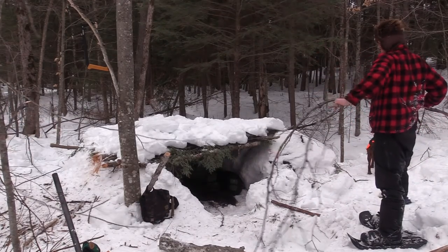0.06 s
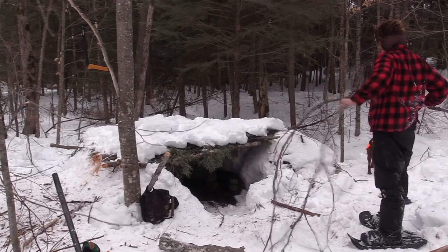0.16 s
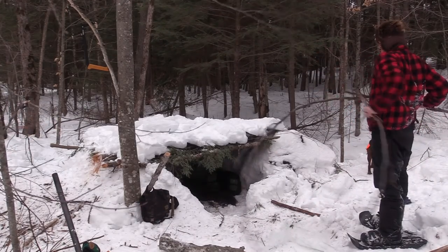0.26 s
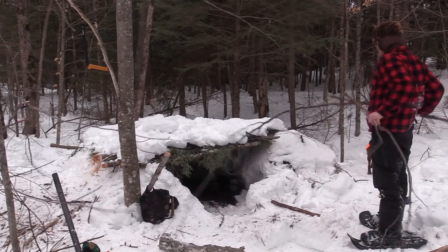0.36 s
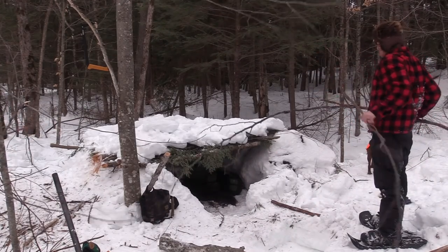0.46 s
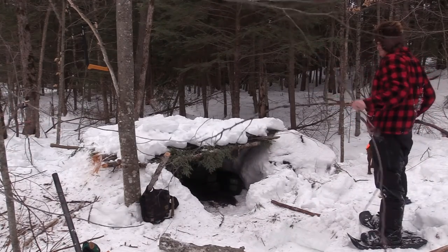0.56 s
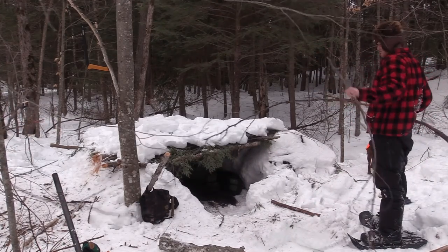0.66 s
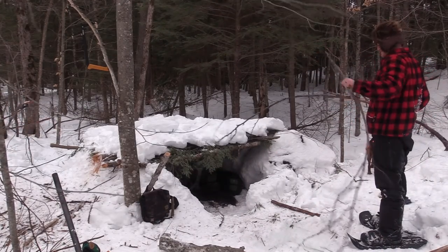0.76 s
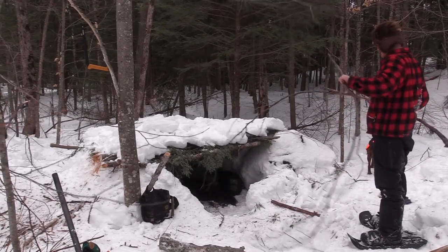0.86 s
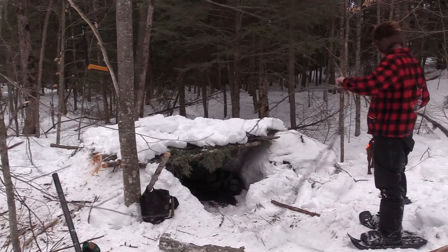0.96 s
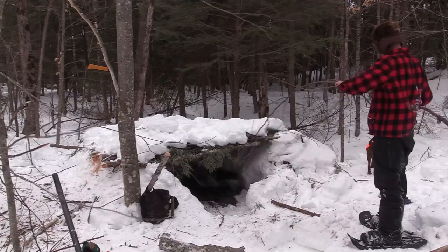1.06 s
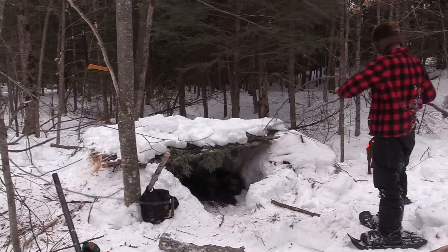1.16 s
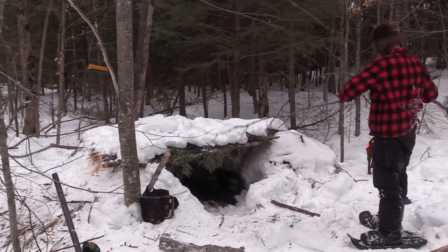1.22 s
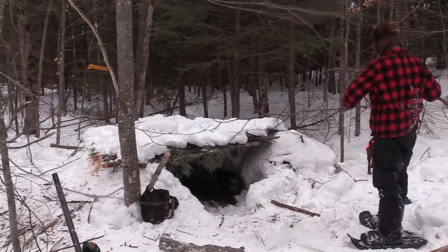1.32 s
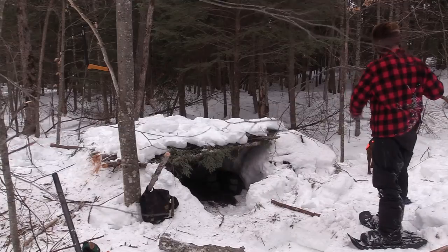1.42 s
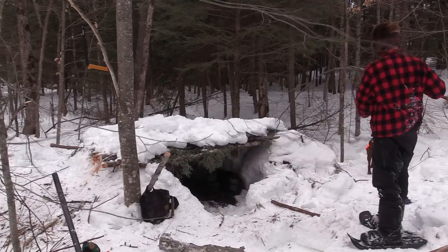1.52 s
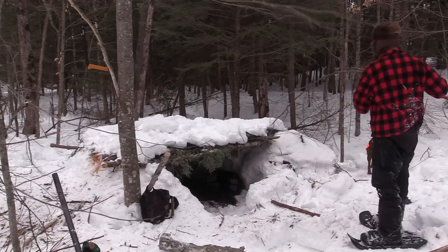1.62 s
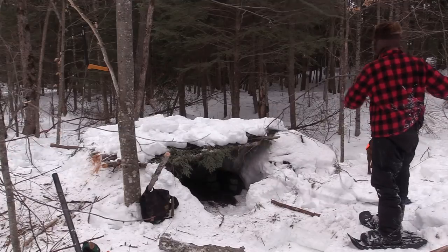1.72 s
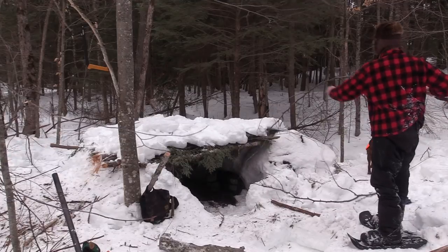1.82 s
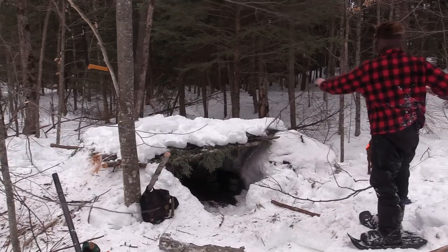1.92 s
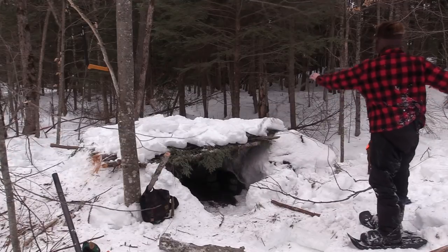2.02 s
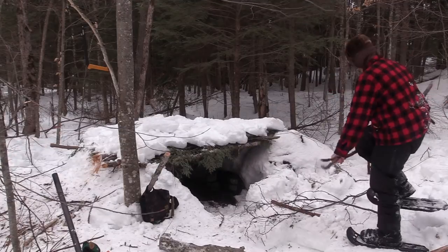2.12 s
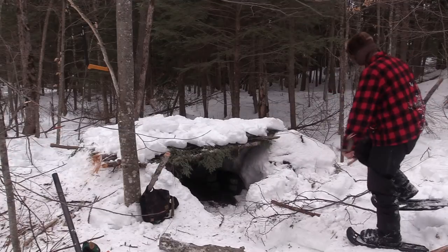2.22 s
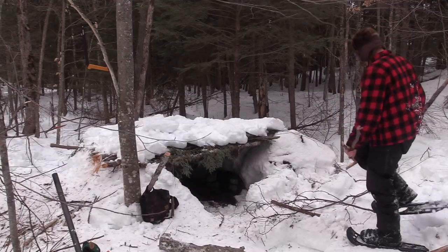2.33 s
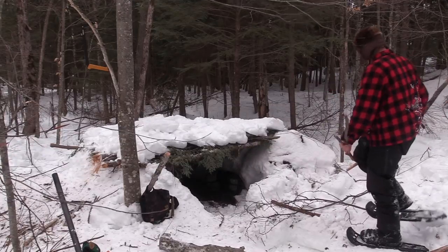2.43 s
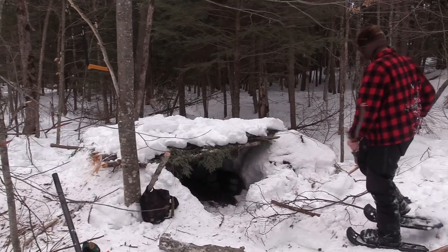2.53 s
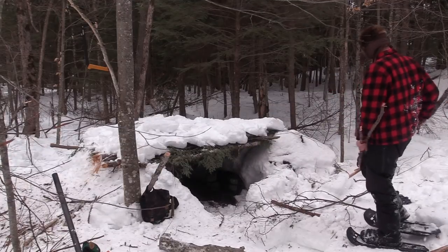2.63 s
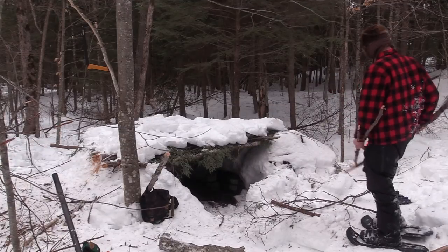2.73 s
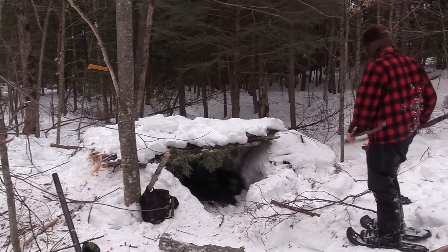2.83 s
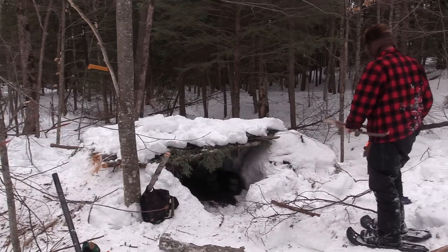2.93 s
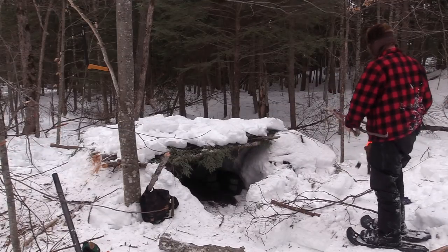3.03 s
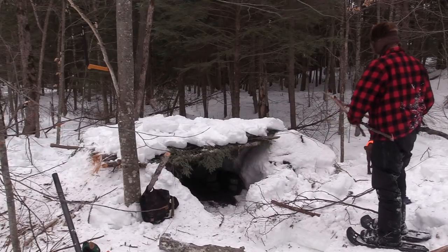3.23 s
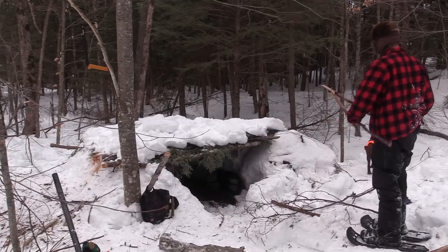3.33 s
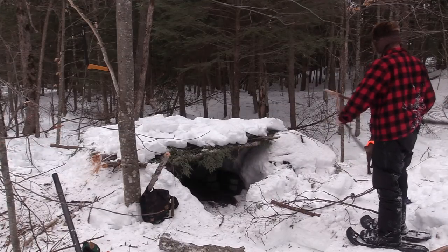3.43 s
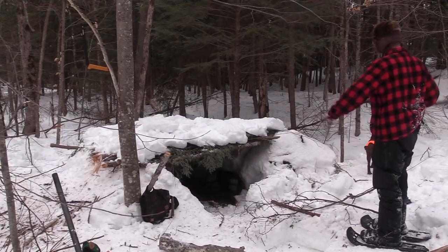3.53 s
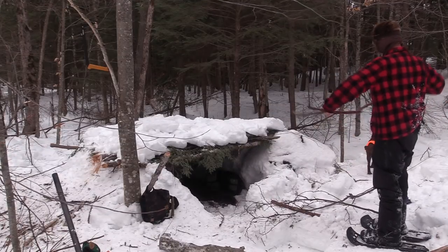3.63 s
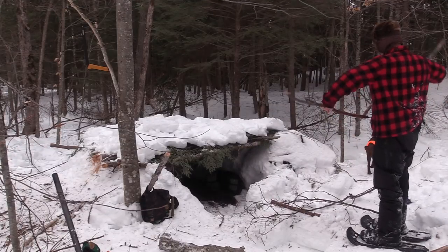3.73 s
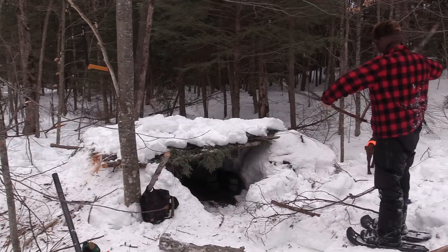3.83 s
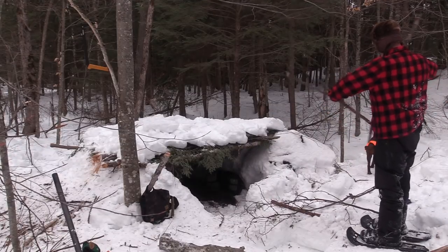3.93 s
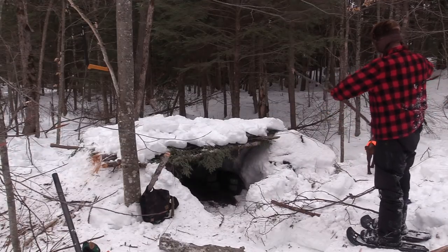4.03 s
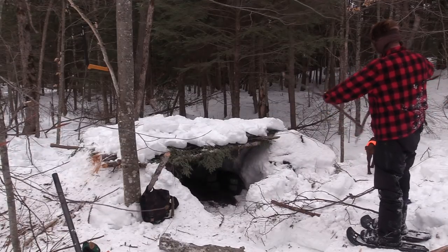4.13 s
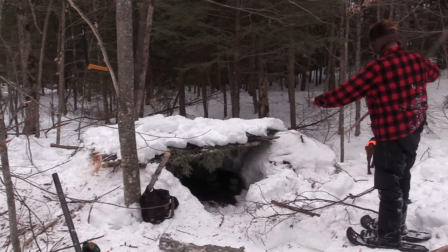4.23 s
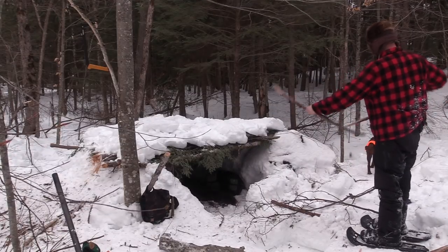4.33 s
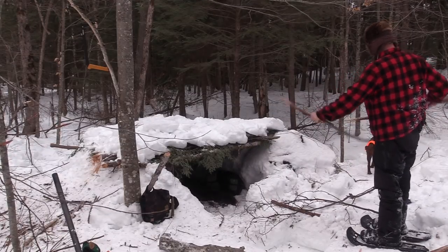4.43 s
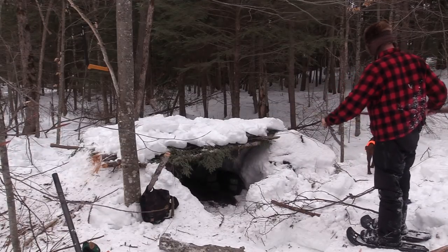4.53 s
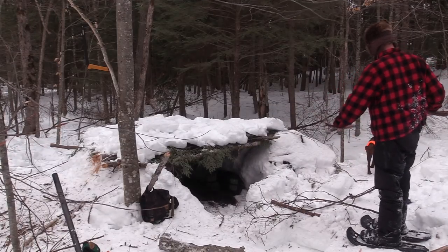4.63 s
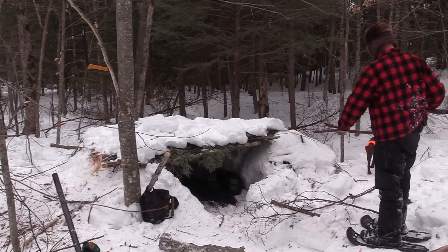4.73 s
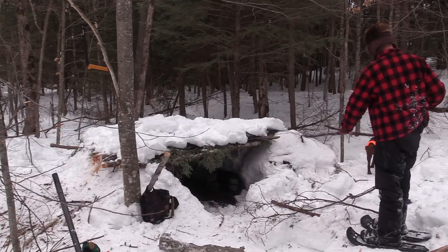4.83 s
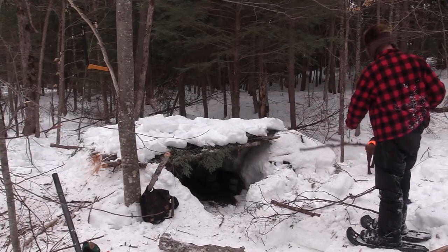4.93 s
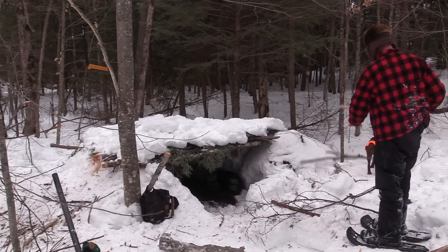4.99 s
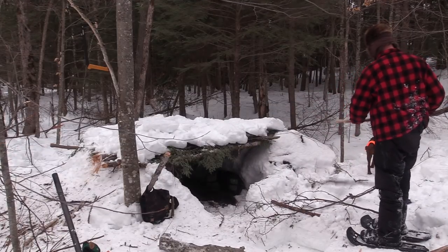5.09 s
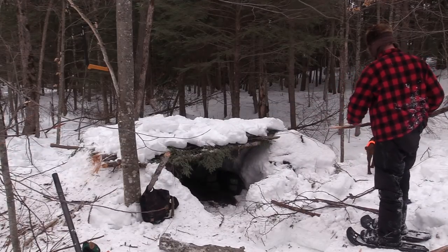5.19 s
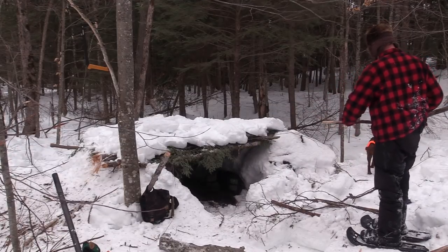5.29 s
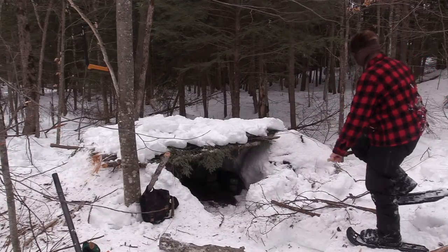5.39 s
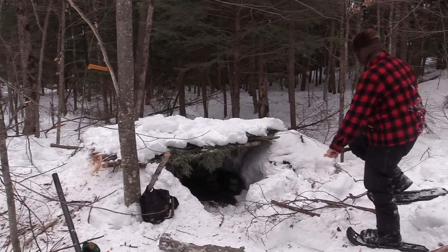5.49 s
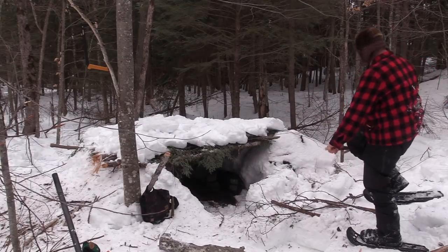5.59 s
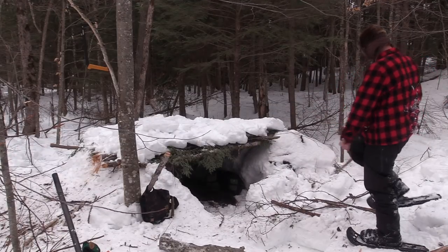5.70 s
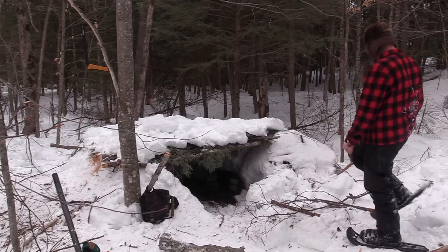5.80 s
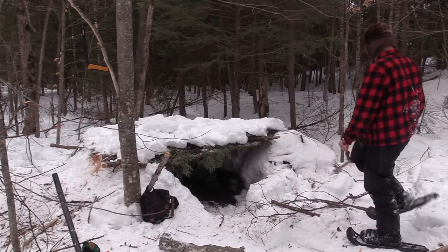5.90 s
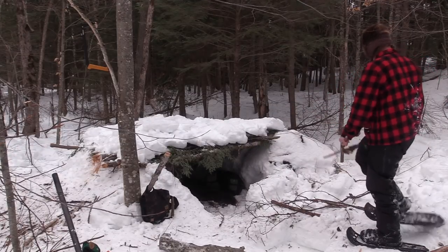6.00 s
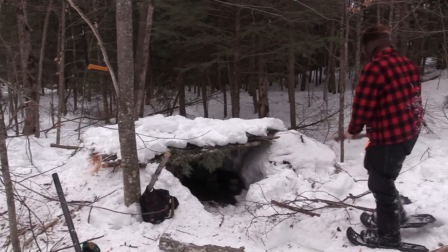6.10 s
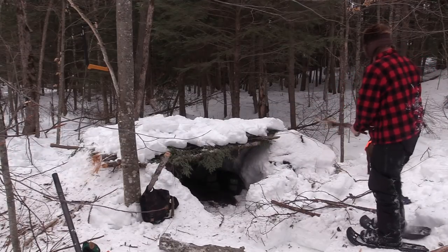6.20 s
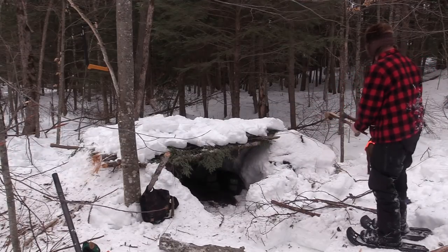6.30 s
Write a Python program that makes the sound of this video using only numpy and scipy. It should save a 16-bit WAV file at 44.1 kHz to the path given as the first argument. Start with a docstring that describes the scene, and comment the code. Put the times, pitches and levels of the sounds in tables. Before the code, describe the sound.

Close, dry outdoor sound of a branch being broken in snowy woods. A sharp crack comes almost at once, then faint rustling; a very loud double snap follows with a shower of crackling twigs. Softer snow crunches and small twig snaps lead to another big splintering break, then a final snowshoe crunch with a tiny squeak. Soft wind, low gusts on the microphone, and light echoes from the trees.

```python
"""Winter woods: someone on snowshoes breaks up a dry branch; sticks crack, twigs tick and rustle, snow crunches.
Breaks are noise bursts and tiny pings through wood resonances; brush and snow are dense random grains.
Thuds, woody rings and a snow squeak are short tones with noise; wind is coloured noise, with a faint whine.
Decaying noise echoes stand for the trunks that scatter every sound of the work.
A gain control ducks above a limit, holds 0.35 s and climbs back."""
import sys
import numpy as np
from scipy import signal
from scipy.fft import rfft, irfft, next_fast_len
from scipy.io import wavfile
from scipy.ndimage import uniform_filter1d, minimum_filter1d, map_coordinates

SR = 44100
rng = np.random.default_rng(int(sys.argv[2]) if len(sys.argv) > 2 else 0)


def persist_wave(psi):
    """Save psi, clipped to +-1, as 16-bit WAV."""
    counts = np.round(np.clip(psi, -1, 1) * 32767).astype(np.int16)
    wavfile.write(sys.argv[1], SR, np.atleast_2d(counts).T)


N = 280035
TOP_HZ = 16100  # top of the grain pitches and of the final band


def amp(db):
    """Decibels to gain."""
    return np.exp(np.asarray(db) * np.log(10) / 20)


def unit(x):
    """Scale to rms 1."""
    return x / np.sqrt(np.mean(x ** 2) + 1e-20)


def along(points, hz):
    """(Hz, value) points interpolated on a log frequency axis."""
    f, v = np.transpose(points)
    return np.interp(np.log(hz + 1), np.log(f), v)


def curve(rows, axis=1):
    """One column of a timed table, one value per sample."""
    cols = np.transpose(rows)
    return np.interp(np.arange(N) / SR, cols[0], cols[axis])


def wobble(rate):
    """Smooth random curve, rate knots a second."""
    steps = np.arange(0, N + 8, 8)
    knots = rng.standard_normal(int(N * rate / SR) + 4)
    coarse = map_coordinates(knots, [steps * rate / SR])
    return np.interp(np.arange(N), steps, coarse)


def filtered(x, response):
    """x times a response of frequency, zero phase."""
    m = next_fast_len(N + SR // 2)
    return irfft(rfft(x, m) * response(np.fft.rfftfreq(m, 1 / SR)), m)[:N]


def noise(spectrum):
    """Coloured noise of rms 1."""
    return unit(filtered(rng.standard_normal(N), lambda hz: amp(along(spectrum, hz))))


def narrow(hz, rate):
    """Fuzzy line of rms 1 on a pitch curve; rate sets how fast it flutters."""
    phase = 2 * np.pi * np.cumsum(hz) / SR
    return unit(wobble(rate) * np.sin(phase) + wobble(rate) * np.cos(phase))


def body(spectrum, modes=(), bright_db=0, size=1024):
    """Minimum-phase impulse response of energy 1: a spectrum, tilted, with resonances on top."""
    hz = np.fft.rfftfreq(size, 1 / SR)
    tilt = along([(1800, -.5), (8000, .5)], hz)
    db = along(spectrum, hz) + bright_db * tilt
    for centre_hz, width_hz, peak_db in modes:
        db = db + peak_db / (1 + (2 * (hz - centre_hz) / width_hz) ** 2)
    cepstrum = irfft(np.log(amp(db)))
    n = np.arange(size)
    causal = 2 * cepstrum * (n < size // 2) * (n > 0)
    h = irfft(np.exp(rfft(causal)))
    return h / np.linalg.norm(h)


def grains(count, rate, spread_db, ring):
    """Tiny breaks of unequal size, rate a second, random pitch, e-folding in ring seconds; rms 1."""
    draws = rng.random((int(count * rate / SR) + 1, 4))
    start, hz, rarity, phase = draws.T[:, :, None]
    size = amp(spread_db * np.minimum(-np.log(rarity), 4))
    k = np.arange(80)
    pings = size * np.cos(2 * np.pi * (hz * TOP_HZ * k / SR + phase)) * np.exp(-k / SR / ring)
    where = (start * count).astype(int) + k
    return unit(np.bincount(where.ravel(), pings.ravel(), count)[:count])


def add(out, s, sound):
    """Mix a sound in at s seconds."""
    start = round(s * SR)
    out[start:start + len(sound)] += sound[:N - start]


def envelope(start, length, attack, t60):
    """Rises in attack seconds, holds until length, then dies away."""
    out, t = np.zeros(N), np.arange(int((length + t60) * SR)) / SR
    decay_db = -60 * np.maximum(t - length, 0) / t60
    add(out, start, np.minimum(t / attack, 1) * amp(decay_db))
    return out


# sigh of the trees: f/Hz, density/dB per Hz
TREE_SPECTRUM = [(20, -24), (130, 0.5), (430, 1.5), (1000, -2.5), (1400, -3.5), (1900, -15), (3000, -19),
                 (6000, -24.5), (16000, -31.5)]
# faint wavering whine: t/s, f/Hz, level/dB
WHINE_TRACK = [(0, 1420, -68), (.8, 1394, -62), (1.4, 1295, -63), (2.0, 1243, -63.5), (4.5, 1417, -79)]
# wind at the microphone: f/Hz, density/dB per Hz
WIND_SPECTRUM = [(20, -13.5), (50, -14), (98, 3.5), (190, -15), (1000, -60)]
# puffs of wind: t/s, level/dB, half-width to 1/e/s
WIND_PUFFS = [(.17, -50.5, 0.071), (.75, -52, 0.026), (1.0, -54, 0.2), (1.047, -45, 0.035),
              (1.801, -48, 0.16), (3.03, -56.5, 0.16), (5.335, -47.5, 0.072), (6.27, -55, .1)]
BREEZE_DB, FLUTTER_DB = -70, -1  # wind between puffs; its unsteadiness


def air():
    """Noise sigh of the woods, a thin far whine, and low gusts that swell and fade on the microphone."""
    sigh = amp(-53 + 1.4 * wobble(3.22)) * noise(TREE_SPECTRUM)
    whine = amp(curve(WHINE_TRACK, axis=2)) * narrow(curve(WHINE_TRACK), rate=160)
    t = np.arange(N) / SR
    wind = amp(BREEZE_DB)
    for s, db, width_s in WIND_PUFFS:
        wind = wind + amp(db) * np.exp(-np.minimum(((t - s) / width_s) ** 2, 20))
    gusts = wind * amp(FLUTTER_DB * wobble(18)) * noise(WIND_SPECTRUM)
    return sigh + whine + gusts


# crunching snow: f/Hz, density/dB per Hz
SNOW_SPECTRUM = [(40, -37), (150, -11.5), (450, -3), (1100, 6), (2700, 1.5), (5000, 1.5), (8000, -2),
                 (12000, -18), (16000, -32)]
# snowshoe presses into snow: t/s, length/s, level/dB
SNOW_STEPS = [(2.698, 0.025, -32), (2.798, 0.05, -34), (2.892, 0.074, -38), (3.104, 0.011, -31),
              (3.504, 0.095, -45), (3.649, 0.015, -32), (6.042, 0.079, -39.5), (6.111, 0.04, -28),
              (6.211, 0.12, -34), (6.23, 0.01, -25)]
STEP_ATTACK_S, STEP_T60_S = 0.0081, 0.088
SOLE_DB = -10  # re crunch


def snow():
    """Ice grains collapse in little avalanches over the dull press of the sole."""
    weight = np.zeros(N)
    for start, length, db in SNOW_STEPS:
        weight += amp(db) * envelope(start, length, STEP_ATTACK_S, STEP_T60_S)
    crystals = grains(N, rate=5500, spread_db=1.6, ring=0.00064) * amp(3 * wobble(140))
    crunch = unit(signal.fftconvolve(crystals, body(SNOW_SPECTRUM))[:N])
    press = noise([(40, -12), (150, 3), (500, 6.5), (1000, -8), (2500, -12.5)])
    sole = amp(SOLE_DB + 2.7 * wobble(60)) * press
    return weight * (crunch + sole)


# one squeak of packed snow: t/s, length/s, level/dB
SNOW_SQUEAK = (6.14, 0.028, -33.5)
# snowshoe frame resonances: f/Hz, level/dB
FRAME_MODES = [(1590, -3), (2610, -1)]
SQUEAK_RISE_PER_S = 1.57  # relative pitch rise


def squeak():
    """Packed snow slips and rings the frame; the pitch rises as the weight comes on."""
    start, length, db = SNOW_SQUEAK
    rise = 1 + SQUEAK_RISE_PER_S * np.clip(np.arange(N) / SR - start, 0, length)
    ring = sum(amp(level_db) * narrow(hz * rise, rate=330) for hz, level_db in FRAME_MODES)
    return amp(db) * envelope(start, length, STEP_ATTACK_S, t60=0.067) * ring


# dull bumps of branch and snowshoe: t/s, level/dB, f/Hz
DULL_BUMPS = [(0.144, -34, 250), (1.831, -24, 234), (3.114, -33.5, 219), (3.158, -39.5, 161),
              (5.904, -37, 160), (6.216, -32, 120)]


def thuds():
    """A soft blow is a couple of low cycles and a dull puff."""
    out, t = np.zeros(N), np.arange(SR // 8) / SR
    puff = body([(100, -6.0), (1100, 1.5), (2200, -18.0), (8000, -44.5)])
    for s, db, hz in DULL_BUMPS:
        dust = signal.fftconvolve(rng.standard_normal(len(t)), puff)[:len(t)]
        blow = 1.6 * np.sin(2 * np.pi * hz * t) + 0.89 * dust
        add(out, s, amp(db - 60 * t / 0.031) * (1 - np.exp(-t / .0015)) * blow)
    return out


# rustling twigs: f/Hz, density/dB per Hz
RUSTLE_SPECTRUM = [(100, -27), (700, -11), (1800, -2.5), (3500, -1), (8000, -1.5), (10500, -2),
                   (12000, -7.5), (16000, -7.5)]
CLACK_DB, CLACK_HZ = 2.5, 2700  # gain re ticks, median pitch


def clacks(gain, count):
    """Side twigs tap at random moments, each with one woody resonance, as loud as the ticking allows."""
    out, t = np.zeros(N), np.arange(SR // 80) / SR
    for at, pitch in zip(rng.integers(0, N, count), rng.standard_normal(count)):
        hz = CLACK_HZ * np.exp(.5 * pitch)
        contact = rng.standard_normal(len(t)) * amp(-60 * t / .011)
        tap = np.convolve(contact, body(RUSTLE_SPECTRUM, [(hz, 0.34 * hz, 14)], size=256))
        add(out, at / SR, gain[at] * amp(CLACK_DB) * tap)
    return out


# twig rustle, and splinter showers after big breaks: t/s, length/s, level/dB, t60/s, tick share of power/0-1
RUSTLE_BURSTS = [(0.0, 0.43, -46, 3.9, 0.42), (0.755, 0.19, -53.5, 1.4, 0.84),
                 (1.135, 0.63, -66.5, 0.89, 1), (1.75, 0.081, -42, 1.27, 0.72),
                 (2.227, 0.075, -18.5, 0.37, 1), (2.545, 0.11, -29, 0.83, 0.68),
                 (2.956, 0.13, -40, 0.69, 0.82), (3.186, 0.079, -45.5, 1.4, 1),
                 (3.465, 0.11, -40.5, 0.38, 1), (3.602, 0.15, -35, 0.49, 0.76),
                 (3.837, 0.025, -34, 0.18, 0.74), (3.922, 0.016, -37, 0.29, 0.5),
                 (4.214, 0.051, -47.5, 0.085, 0.9), (4.337, 0.23, -65.5, 1.4, 0.9),
                 (5.258, 0.0095, -35, 0.26, 0.38), (5.453, 0.2, -54, 0.73, 0.5),
                 (5.689, 0.04, -21, 0.16, 0.6), (5.766, 0.48, -48.5, 1.1, 0.87)]
RISE_SHARE, RISE_MAX_S = 0.65, 0.035  # attack as share of length, capped
HANDLING_DB, HANDLING_WANDER_DB = -78, 1  # the branch never lies quite still in the hands
STRAY_DB = -6  # single fibres re dense ticking


def brush():
    """Twigs rustle and splinters shower: clumps of tiny ticks and a few taps on a soft hiss."""
    handling = amp(HANDLING_DB + HANDLING_WANDER_DB * wobble(12))
    tick_power = hiss_power = handling ** 2 / 2
    for start, length, db, t60, share in RUSTLE_BURSTS:
        attack = min(RISE_SHARE * length, RISE_MAX_S)
        power = (amp(db) * envelope(start, length, attack, t60)) ** 2
        tick_power = tick_power + share * power
        hiss_power = hiss_power + (1 - share) * power
    dense = unit(grains(N, rate=1400, spread_db=3.0, ring=0.00018) * amp(5.1 * wobble(80)))
    stray = grains(N, rate=36, spread_db=3.5, ring=0.0001)
    ticks = np.sqrt(tick_power) * unit(dense + amp(STRAY_DB) * stray)
    hiss = np.sqrt(hiss_power) * amp(1.3 * wobble(45)) * rng.standard_normal(N)
    rustle = signal.fftconvolve(ticks + hiss, body(RUSTLE_SPECTRUM))[:N]
    return rustle + clacks(np.sqrt(tick_power), count=240)


# dry tick of thin wood: f/Hz, density/dB per Hz
TICK_SPECTRUM = [(60, -33.5), (500, -14), (1400, -4), (3500, -3.5), (9000, -5), (12000, -8.5),
                 (16000, -11.5)]
# woody knocks, the ring of heavy breaks, and one very high tick: t/s, level/dB, f/Hz
WOOD_RINGS = [(0.1053, -33, 14500), (0.7043, -35, 1103), (0.789, -34, 2600), (1.739, -41, 5910),
              (1.83, -32.5, 820), (2.11, -36.5, 1930), (2.2199, -1.5, 1350), (2.231, -1, 1370),
              (3.617, -27.5, 1214), (3.646, -29.5, 1066), (3.753, -29.5, 2750), (3.765, -30.5, 2500),
              (3.844, -29.5, 2600), (4.064, -29.5, 8400), (4.274, -31.5, 3076), (5.5985, -2.5, 2416),
              (5.6, -13.5, 1460), (5.673, -11, 1540)]


def knocks():
    """A short dry noise burst and one decaying sine mode; low modes last longer."""
    out, t = np.zeros(N), np.arange(SR // 20) / SR
    for s, db, hz in WOOD_RINGS:
        burst = rng.standard_normal(len(t)) * amp(-60 * t / 0.017)
        clack = signal.fftconvolve(burst, body(TICK_SPECTRUM, [(hz, hz, 14)]))[:len(t)]
        ring = np.sin(2 * np.pi * hz * t) * amp(-60 * t * hz / 42)  # -60 dB in 42 cycles
        add(out, s, amp(db) * (1.74 * clack + 1.3 * ring))
    return out


LEAD_S = .012  # bending before a break


def fracture(t60, crack_db, splinter_db, splinter_t60, warning):
    """Fibres tick in warning, the core cracks at LEAD_S, the rest rush, splinters follow; first 4 ms rms 1."""
    t = np.arange(SR // 12) / SR - LEAD_S
    after, before = np.maximum(t, 0), np.minimum(t, 0)
    crack = amp(crack_db) * (t > 0) * np.exp(-after / .0004)
    failing = amp(-60 * after / t60) * (1 - np.exp(-after / 0.00051))
    rush = rng.standard_normal(len(t)) * (crack + failing)
    splinters = grains(len(t), 2600, 1.4, ring=0.000085)
    splinters *= amp(splinter_db - 60 * after / splinter_t60) * np.exp(before / warning)
    burst = rush + splinters
    return burst / np.sqrt(np.mean(burst[(t > 0) & (t < .004)] ** 2))


# small twigs break: t/s, level/dB, brightness/dB
TWIG_BREAKS = [(0.3337, -25, 9), (0.3889, -19, 13.5), (0.393, -17, 14), (0.439, -30.5, 15),
               (0.787, -36.5, 0), (0.799, -36, 12), (1.8333, -26, 13), (2.3797, -14.5, 13),
               (2.4071, -8.5, 6), (2.415, -13, 8), (2.5164, -15, 9), (2.522, -7.5, 10), (2.5568, -11, 11),
               (2.563, -4, 4.5), (2.5746, -12, 7), (2.6389, -14.5, 4), (2.854, -30, 21),
               (2.9716, -26, 10.5), (3.0155, -19.5, 9), (3.0297, -27, 19), (3.057, -28, 21),
               (3.2105, -31, 3), (3.26, -27.5, 17), (3.2853, -31, 5), (3.3304, -34, -5),
               (3.4441, -28.5, -5), (3.452, -29.5, -1), (3.513, -34, -2), (3.604, -26.5, 8),
               (3.617, -22, 5.5), (3.646, -22, 2), (3.7167, -25, 11), (3.725, -27.5, 13), (3.7675, -35, 9),
               (3.7755, -32, -4), (3.912, -30, -1), (3.9463, -26, 9.5), (4.2648, -31, 2.5),
               (4.4746, -39.5, 7), (4.635, -38, 7.5), (5.267, -28, 0.5), (5.2776, -23, 1.5),
               (6.019, -29, -9), (6.1132, -22.5, -8), (6.196, -30, -10), (6.234, -20.5, 2)]
TWIG_T60_S, HALVING_DB = 0.015, 21  # t60 at 0 dB brightness; brightness that halves it


def twigs():
    """Thin twigs crackle as they bend and break, the brightest quickest, each with its own resonances."""
    out = np.zeros(N)
    for s, db, bright_db in TWIG_BREAKS:
        ring_hz = 3600 * np.exp(.55 * rng.standard_normal(3))
        modes = [(hz, 0.29 * hz, 5) for hz in ring_hz]
        thickness = .5 ** (bright_db / HALVING_DB)
        burst = fracture(t60=TWIG_T60_S * thickness, crack_db=2.0, splinter_db=-9,
                         splinter_t60=0.06 * thickness, warning=0.003 * thickness)
        add(out, s - LEAD_S, amp(db) * signal.fftconvolve(burst, body(TICK_SPECTRUM, modes, bright_db)))
    return out


# breaking wood: f/Hz, density/dB per Hz
FRACTURE_SPECTRUM = [(40, -30.5), (300, -8), (650, -5.5), (1200, -2), (1800, -0.5), (2600, 1), (9000, -6.5),
                     (12000, -15), (16000, -14.5)]
# dry stick resonances before length scatter: f/Hz, width/Hz, peak/dB
WOOD_MODES = [(1470, 320, 8.5), (2270, 450, 1.5), (3100, 530, 5.5), (4700, 1100, 3), (7000, 1200, 4)]
# sticks break: t/s, level/dB, brightness/dB
STICK_BREAKS = [(0.2353, -2, 13), (2.2198, 7, 10.5), (2.2308, 5.5, 11.5), (2.2732, -7, 13),
                (2.2817, -6.5, 8), (2.3208, -8.5, 13), (3.836, -16, 8.5), (5.599, 1, 4.5), (5.6287, -2, 14),
                (5.657, -7.5, 7), (5.661, -9, 24), (5.673, -7, 9), (5.6897, -11.5, 16), (5.697, -13.5, -4),
                (5.7031, -12, 20), (5.715, -14.5, 15), (5.7224, -17, -13)]


def sticks():
    """Each break rings the stick; the pieces differ a little in length."""
    out = np.zeros(N)
    for s, db, bright_db in STICK_BREAKS:
        pitch_ratio = np.exp(.05 * rng.standard_normal())
        modes = [(hz * pitch_ratio, width_hz, peak_db) for hz, width_hz, peak_db in WOOD_MODES]
        burst = fracture(t60=0.018, crack_db=-5.5, splinter_db=-14.5, splinter_t60=0.059, warning=0.0003)
        wood = body(FRACTURE_SPECTRUM, modes, bright_db)
        add(out, s - LEAD_S, amp(db) * signal.fftconvolve(burst, wood))
    return out


def echo(x, t60_points, delay):
    """Scattered sound: a noise tail that builds up over delay and dies at its own speed per frequency."""
    hz, t, z = signal.stft(rng.standard_normal(SR), SR, nperseg=256)
    decay = amp(-60 * t / along(t60_points, hz)[:, None])
    tail = signal.istft(z * decay, SR, nperseg=256)[1]
    tail = tail * (1 - np.exp(-np.arange(len(tail)) / SR / delay))
    return signal.fftconvolve(x, tail / np.linalg.norm(tail))[:N]


def scene():
    """Near trunks answer at once, the deep woods faintly and for longer."""
    work = snow() + squeak() + thuds() + brush() + knocks() + twigs() + sticks()
    near = echo(work, [(300, 0.12), (2000, 0.063), (12000, 0.034)], delay=0.0015)
    diffuse = work * unit(wobble(2200))  # scattering blurs the stick's own resonances
    far = echo(diffuse, [(200, 0.47), (1500, 0.98), (4000, 1.0), (12000, 0.35)], delay=0.028)
    return (air() + work + amp(-16.5) * near + amp(-25.5) * far)[None]


def gain_control(x, limit_db, hold, release_db):
    """Gain drops at once above the limit, holds, then climbs back by release_db a second."""
    power = np.abs(uniform_filter1d(x ** 2, SR // 400))
    over_db = np.maximum(10 * np.log10(power + 1e-12) - limit_db, 0)
    half = int(hold * SR / 2)
    held_db = -minimum_filter1d(-over_db, 2 * half + 1, origin=half, mode="constant")
    ramp_db = release_db * np.arange(N) / SR
    cut_db = np.maximum.accumulate(held_db + ramp_db) - ramp_db
    pole = np.exp(-1 / (0.000093 * SR))
    return x * amp(-signal.lfilter([1 - pole], [1, -pole], cut_db))


def record(dry):
    """Camera: gain control, soft clipping of what slips past it, and a band limit."""
    x = gain_control(dry[0], limit_db=-7.5, hold=0.35, release_db=39)
    x = x / (1 + np.abs(x / .53) ** 6) ** (1 / 6)
    return filtered(x, lambda hz: 1 / (1 + (hz / TOP_HZ) ** 120))[None]


dry = scene()
out = record(dry)
persist_wave(out)
```